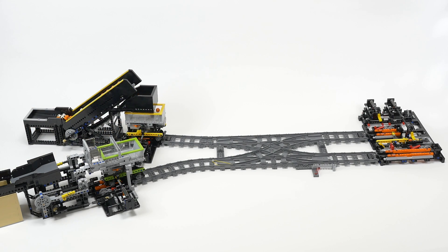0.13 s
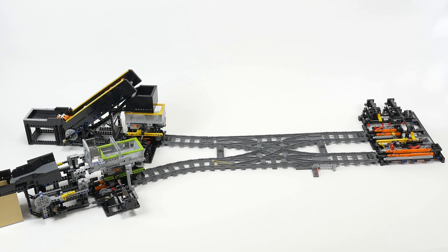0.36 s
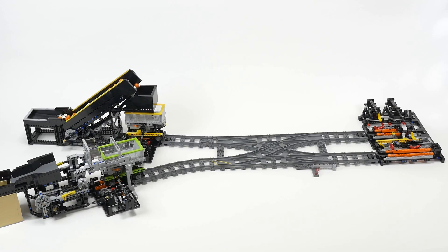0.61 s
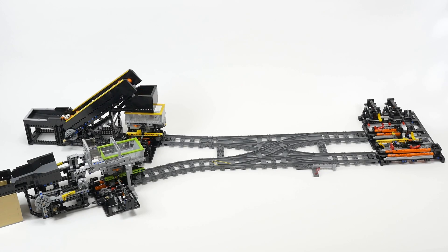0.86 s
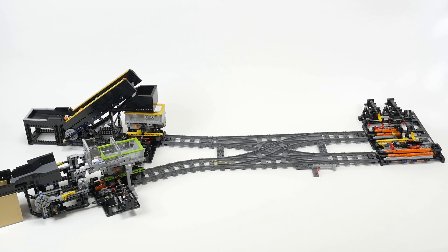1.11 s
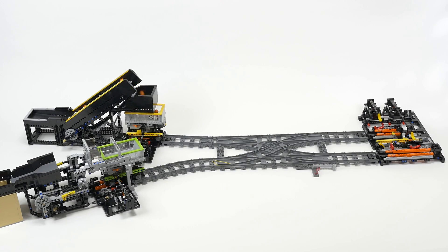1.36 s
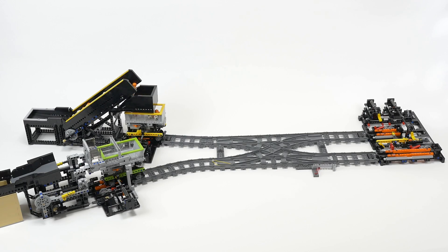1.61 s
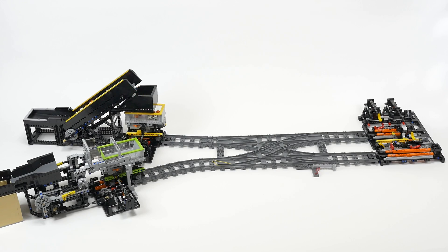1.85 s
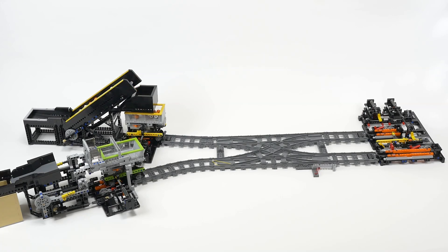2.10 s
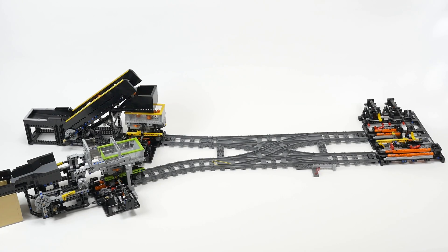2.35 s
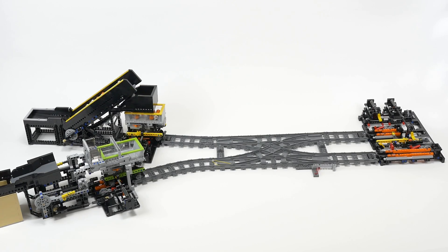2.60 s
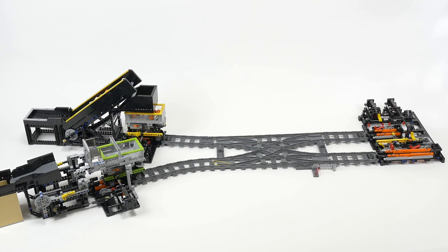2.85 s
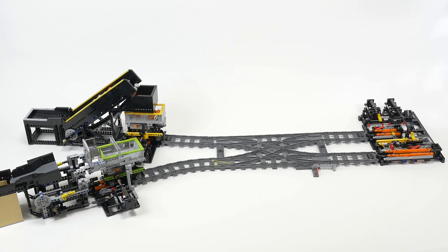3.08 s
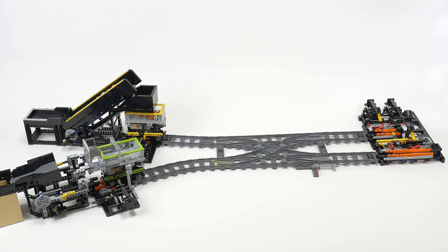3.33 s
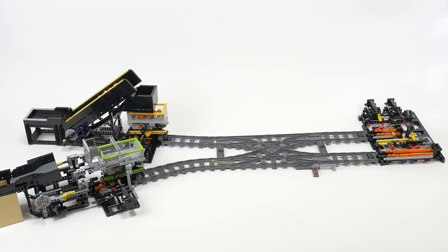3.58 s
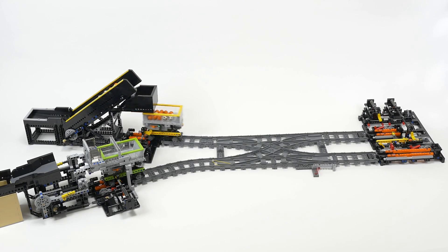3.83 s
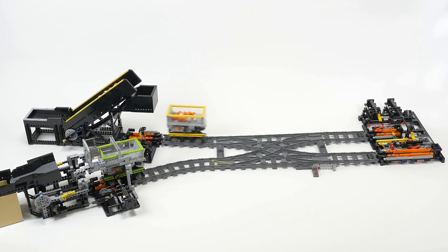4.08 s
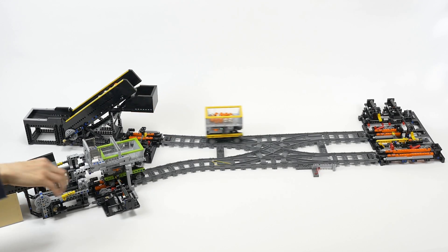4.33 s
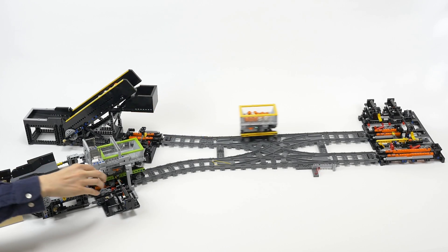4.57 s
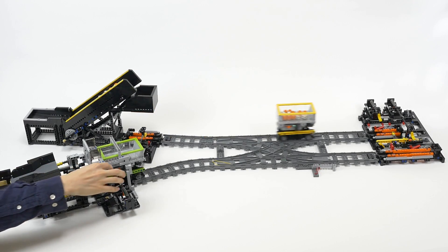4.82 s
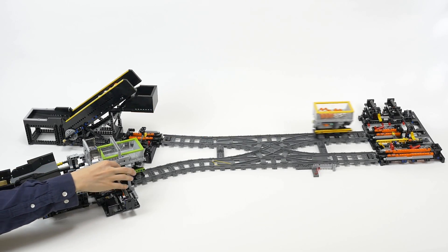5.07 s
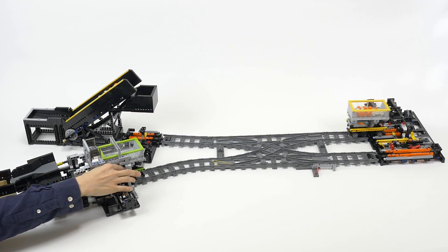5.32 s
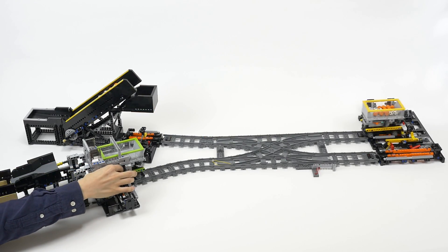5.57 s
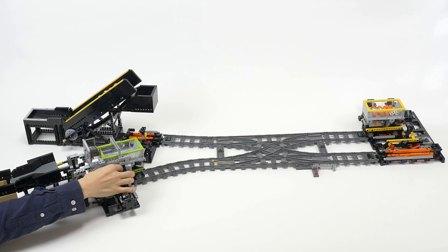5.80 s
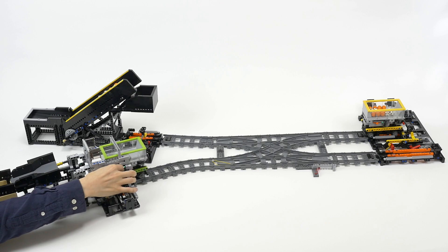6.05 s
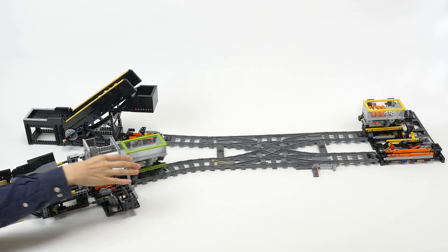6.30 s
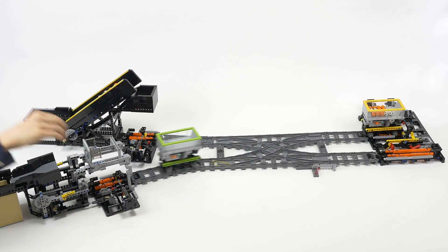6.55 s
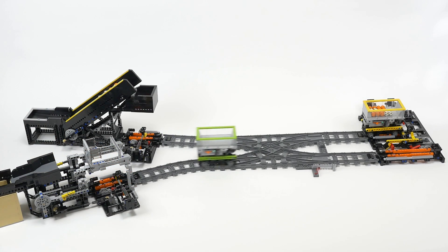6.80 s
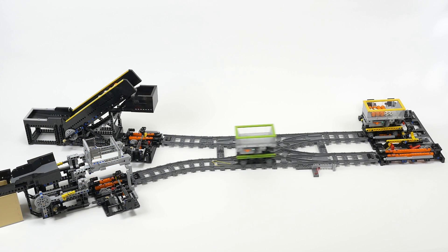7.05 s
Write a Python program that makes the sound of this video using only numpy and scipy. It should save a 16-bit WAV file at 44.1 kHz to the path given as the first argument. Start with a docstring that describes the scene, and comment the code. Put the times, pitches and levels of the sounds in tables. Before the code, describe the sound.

Close stereo pickup of a motorised plastic toy railway on a table. Sharp hollow clacks of balls landing in a wagon dominate the first seconds over a faint motor drone and thin whine. After a short lull the wagon lurches away in a rattling burst, rolls more softly, then scrapes and clacks into a platform. Finally soft thumps and a stronger motor whirr accompany another wagon. Short room decay.

```python
"""Plastic balls drop and bounce in a toy wagon, which later knocks as it rolls: random contact impulses
excite its hollow resonances, and a loose load rattles. Clacks, noise-like scraping and soft thumps follow
on track and platform. Geared motors drone, hiss and whine throughout, as filtered noise and a wavering
tone; a dry axle squeaks briefly. A low rumble lies beneath, and the blows decay in a small room, in stereo."""
import sys
import numpy as np
from scipy import signal
from scipy.fft import rfft, irfft, next_fast_len
from scipy.io import wavfile
from scipy.ndimage import uniform_filter1d

SR = 44100
rng = np.random.default_rng(int(sys.argv[2]) if len(sys.argv) > 2 else 0)


def to_wav(sig):
    """Store sig (one row per channel, or 1-D mono) as 16-bit WAV at the path in sys.argv[1].

    Samples outside -1..1 are clipped; the rate is SR.
    """
    pcm = np.clip(np.atleast_2d(sig), -1, 1) * 32767
    pcm = np.round(pcm).astype(np.int16)
    wavfile.write(sys.argv[1], SR, pcm.T)  # frames by channels


def decibels_to_gain(level_db):
    """Convert a level in decibels to a linear amplitude gain (20 dB per decade)."""
    exponent = np.asarray(level_db, float) / 20
    return 10 ** exponent


N = 316197

# ball drops and bounces, then knocks of the rolling wagon:
# (time [s], nominal peak [dB], brightness [dB], hollow ring [dB])
WAGON_KNOCKS = [(0.071, -1, 5.5, 1), (0.126, -3.5, 2.5, -23), (0.182, -11.5, 9, 15),
                (0.227, -10.5, 1.5, -8), (0.282, -18.5, 3, 6), (0.443, -22, 1, 6), (0.464, -3, -0.5, -3),
                (0.546, -10, 6.5, 9.5), (0.627, -13.5, -2.5, 2), (0.786, -15, 8, 8), (0.806, -6, 4, -3),
                (0.883, -1, 3, -7), (0.925, -12.5, -5, -2), (1.003, -10, 2, 1), (1.117, -17, 9, 15),
                (1.164, -3.5, 2.5, 0), (1.183, -8.5, 4, -1), (1.23, -9.5, 3, 9), (1.255, -10, 0.5, -5),
                (1.301, -9, 0, -7), (1.467, -17.5, 4.5, 6), (1.507, -4.5, 3.5, -6), (1.568, -10.5, 6.5, 14),
                (1.594, -19, 1, -1), (1.687, -14.5, 2.5, 4.5), (1.842, -7, 3, -1), (1.853, -3, 4.5, 2.5),
                (1.897, -1.5, 2, 1.5), (1.951, -12.5, -2.5, -9), (1.998, -16.5, 1, -2), (2.047, -22, 1, 22),
                (2.189, -4.5, 2.5, 3.5), (2.236, -10, 5, 7), (2.291, -23.5, -3, -7), (2.572, -2.5, 5, 3.5),
                (2.783, -24.5, 1, 12), (3.28, -2, 2.5, 8), (3.292, -3.5, -5, 11), (3.302, -3.5, 5.5, -3),
                (3.328, -8.5, 11.5, -6), (3.387, -13, 7, 26), (3.421, -10, 4, 9), (3.466, -15, -8, -10),
                (3.553, -11, 17, 16), (3.682, -13, 3.5, 9), (3.716, -11, -2, 10), (3.775, -19, -4, 8),
                (3.847, -17.5, 7, 12), (3.89, -9, 7, -3), (4.041, -11.5, -8, 10), (4.071, -11, 0, -11),
                (4.101, -9.5, -2, -2), (4.132, -19.5, 0, -9), (4.212, -26, -20, -8), (4.257, -21.5, -8, 2),
                (4.407, -21, -10, -3), (4.44, -23, -8, 5), (4.576, -26, -9, 12), (4.883, -34, -4, -3)]
# resonances of the hollow plastic wagon: (frequency [Hz], width [Hz], level [dB])
WAGON_MODES = [(828, 39, 3.5), (1120, 36, -1), (1533, 43.5, 3.5), (2140, 210, -8), (2530, 110, -12.5),
               (4060, 40, 0), (4484, 360, -5), (6200, 350, -6.5)]
# broad colour of the wagon's shell: (frequency [Hz], level per Hz [dB])
WAGON_SHELL = [(260, -37), (450, -19.5), (569, -18), (809, -10.5), (1370, -9), (1570, -3.5), (2780, -8.5),
               (4190, -10), (7980, -18.5), (11500, -17), (13200, -24.5), (15000, -50)]
# broad colour of the platform: (frequency [Hz], level per Hz [dB])
PLATFORM_SHELL = [(240, -30), (400, -13), (680, -8.5), (828, -12.5), (1090, -11.5), (2030, -2.5),
                  (3450, -9), (4530, -9), (7930, -16.5), (11400, -16), (13200, -22.5), (15000, -45)]
# broad colour of the table: (frequency [Hz], level per Hz [dB])
TABLE_COLOUR = [(140, -46), (240, -15), (360, -7.5), (414, -2.5), (487, -11.5), (532, -5.5), (893, -12),
                (1180, -11.5), (1400, -12), (1820, -54), (3080, -120)]
# motor drone: (time [s], level [dB])
DRONE_LEVEL = [(0.0, -45), (1.0, -43), (2.35, -46), (3.3, -43.5), (3.95, -44), (4.09, -36), (4.21, -40.5),
               (5.13, -41), (5.27, -39), (5.45, -35), (5.57, -41.5), (5.95, -47.5), (6.11, -40), (6.3, -33),
               (6.67, -39), (7.17, -36.5)]


def unit(x):
    """Normalization by mean power: x scaled to rms 1."""
    return x / np.sqrt(np.mean(x ** 2) + 1e-20)


def along(points, hz):
    """A spectrum read between its (Hz, value) points on a logarithmic frequency axis."""
    f, v = np.transpose(points)
    return np.interp(np.log(hz + 1), np.log(f + 1), v)


def curves(rows):
    """Linear interpolation in time: one value per sample for each column after the time."""
    s, *columns = np.transpose(rows)
    return [np.interp(np.arange(N) / SR, s, c) for c in columns]


def filtered(x, response):
    """Linear filtering: the spectrum of x times a response of frequency."""
    n = x.shape[-1]
    m = next_fast_len(n + 4096)
    return irfft(rfft(x, m) * response(np.fft.rfftfreq(m, 1 / SR)), m)[..., :n]


def causal(gain):
    """Minimum phase: folding the cepstrum makes the response start at the blow."""
    cepstrum = irfft(np.log(gain + 1e-6))
    half = len(cepstrum) // 2
    cepstrum[1:half] *= 2
    cepstrum[half + 1:] = 0
    return np.exp(rfft(cepstrum, len(cepstrum)))[:len(gain)]


def modes(peaks, f, scatter_db=0):
    """Modal superposition: the summed gains of damped resonances."""
    scatter_db = scatter_db + np.zeros(len(peaks))
    total = 0
    for (centre, width, db), extra_db in zip(peaks, scatter_db):
        total = total + decibels_to_gain(db + extra_db) * f * width / np.hypot(centre ** 2 - f ** 2, f * width)
    return total


def panned(db):
    """Interaural level difference: left and right gains that differ by db, positive to the left."""
    return decibels_to_gain(np.array([db / 2, -db / 2]))


def pair(gain, patchy_db):
    """Partly coherent stereo noise of rms 1, its level varying at random over time and frequency."""
    # (frequency [Hz], left-right correlation)
    likeness = [(60, 0.64), (240, 1), (950, 0.65), (3770, 0.42), (15000, 0.44)]
    z = signal.stft(rng.standard_normal((2, N)), nperseg=512)[2]
    field = rng.standard_normal(z.shape[1:])
    field = uniform_filter1d(uniform_filter1d(field, 5, 0), 8, 1)
    patchy = signal.istft(z * decibels_to_gain(patchy_db * unit(field)), nperseg=512)[1][:, :N]

    def mid_side_gain(hz):
        # the cosine of twice this angle is the correlation
        angle = np.arccos(np.clip(along(likeness, hz), -1, 1)) / 2
        return gain(hz) * np.array([np.cos(angle), np.sin(angle)])

    mid, side = filtered(patchy, mid_side_gain)
    return unit(np.array([mid + side, mid - side]))


def room(x, shared):
    """Reverberation: convolution with decaying stereo noise, each frequency dying at its own rate."""
    # (frequency [Hz], time to decay by 60 dB [s])
    decay = [(400, 0.042), (1500, 0.32), (4000, 0.25), (10000, 0.32)]
    common, left, right = rng.standard_normal((3, SR // 3))
    share = np.clip(shared, 0, 1)
    noise = share * common + np.sqrt(1 - share ** 2) * np.array([left, right])
    hz, t, z = signal.stft(noise, SR, nperseg=256)
    fading = decibels_to_gain(-60 * t / along(decay, hz)[:, None])
    tail = signal.istft(z * fading, SR, nperseg=256)[1]
    return signal.fftconvolve(x[None], tail / np.linalg.norm(tail[0]), axes=1)


def plastic(f, shell, tilt_db=0, ring_db=0, scatter_db=0, rings=1.2, hollow_hz=1570):
    """Struck plastic: shell colour and sharp modes, tilted by contact hardness, plus a hollow note."""
    tilt = tilt_db * np.clip(np.log2((f + 1) / 2500) / 1.34, 0, 1.3)
    hollow = ring_db * np.exp(-((f - hollow_hz) / 200) ** 2)
    return decibels_to_gain(along(shell, f) + tilt + hollow) * (0.5 + rings * modes(WAGON_MODES, f, scatter_db))


def knocks(events, shell, rings, wet_db, place_db):
    """Impact excitation: each knock is a flurry of contacts that rings the plastic, then the room."""
    contact_ms, softer_ms_per_db = 6.66, 0.25  # flurry length at 0 dB; softer knocks last longer
    crest_db = 11  # nominal peak over the flurry's rms
    out, t = np.zeros((2, N + SR)), np.arange(2048) / SR
    for s, db, bright_db, ring_db in events:
        length = max(contact_ms - softer_ms_per_db * db, 1) / 1000  # [s]
        pan_db = place_db + rng.standard_normal()  # knocks land a little left or right
        spikes = rng.standard_normal(len(t)) * decibels_to_gain(5.9 * rng.standard_normal(len(t)))
        rise = 1 - np.exp(-t / (0.4 * length))
        # small after-bounces of uneven strength
        uneven = unit(uniform_filter1d(rng.standard_normal(len(t)), 130))
        chatter = decibels_to_gain(-12.5 + 4.0 * uneven) * np.exp(-t / 0.018)
        flurry = spikes * rise * (np.exp(-(t / length) ** 3) + chatter)
        scatter_db = 3 * rng.standard_normal(len(WAGON_MODES))
        # the hollow note varies at random from knock to knock
        hollow_hz = 1570 + 60 * rng.standard_normal()
        hit = filtered(flurry, lambda f: causal(
            plastic(f, shell, bright_db, ring_db, scatter_db, rings, hollow_hz)))
        hit *= decibels_to_gain(db - crest_db) / np.sqrt(np.sum(hit ** 2) / (SR * length))
        wet = decibels_to_gain(wet_db) * room(hit, shared=0.6)
        sides = panned(pan_db)[:, None]
        out[:, round(s * SR):][:, :len(t)] += sides * hit
        out[:, round((s + 0.005) * SR):][:, :wet.shape[1]] += sides * wet  # the first walls answer late
    return out[:, :N]


def jostle(gain, pan_db, shell, rings, per_second, near_share):
    """Shot noise: dense tiny clicks of uneven size through plastic, mostly lost in diffuse noise."""
    clicks = (rng.random(N) < per_second / SR) * rng.standard_normal(N)
    clicks = clicks * decibels_to_gain(4 * rng.standard_normal(N))
    near = unit(filtered(clicks, lambda f: causal(plastic(f, shell, rings=rings))))
    far = pair(lambda f: plastic(f, shell, rings=rings), patchy_db=3.5)
    return gain * panned(pan_db)[:, None] * (near_share * near + far)


def swell(s, db, rise_s, fall_s):
    """Exponential growth and decay: power that grows towards a moment and dies after it."""
    t = np.arange(N) / SR - s
    time_constant = np.where(t < 0, max(rise_s, 1e-3), max(fall_s, 1e-3))
    return decibels_to_gain(db) ** 2 * np.exp(-2 * np.abs(t) / time_constant)


def air_rumble():
    """Ambient noise: a steady low rumble shaped by its power spectrum."""
    # (frequency [Hz], level per Hz [dB])
    rumble_colour = [(12, -49), (20, -21), (32, -36), (65, 11), (108, 2), (130, 5), (170, -51), (290, -120)]
    return decibels_to_gain(-68.5) * pair(lambda f: decibels_to_gain(along(rumble_colour, f)), patchy_db=1.0)


def motor_drone():
    """Forced vibration: broad motor noise excites the table's colour and the housing's resonances."""
    # motor housing and table: (frequency [Hz], width [Hz], level [dB])
    housing = [(423, 66, 2.5), (1160, 20.4, 9)]
    level_db, = curves(DRONE_LEVEL)
    colour = lambda f: decibels_to_gain(along(TABLE_COLOUR, f)) * (1 + 1.22 * modes(housing, f))
    return decibels_to_gain(level_db) * pair(colour, patchy_db=1.5)


def wheel_rumble():
    """Rolling noise: low random vibration through the table that follows the drone's swings."""
    # (frequency [Hz], level per Hz [dB])
    rolling_colour = [(29, -52), (50, -21), (124, -16), (193, -3.5), (231, -11.5), (320, 1), (420, -33),
                      (700, -120)]
    drone_db, = curves(DRONE_LEVEL)
    level_db = -51 + 0.87 * (drone_db - drone_db.mean())
    return decibels_to_gain(level_db) * pair(lambda f: decibels_to_gain(along(rolling_colour, f)), patchy_db=3.0)


def gear_hiss():
    """Friction noise: the gears' bright, broadband hiss."""
    # (frequency [Hz], level per Hz [dB])
    gear_colour = [(760, -23), (1300, -48), (2950, -8), (3170, -3.5), (4650, -11.5), (5330, -1),
                   (5790, -3.5), (6350, -1), (9620, -4), (13300, -5), (15500, -18)]
    # (time [s], level [dB])
    hiss_level = [(0, -41.5), (2.4, -43.5), (3.8, -43.5), (5.0, -40.5), (5.6, -43.5), (6.1, -41),
                  (6.5, -37), (7.17, -36)]
    level_db, = curves(hiss_level)
    return decibels_to_gain(level_db) * pair(lambda f: decibels_to_gain(along(gear_colour, f)), patchy_db=0.8)


def mesh_whine():
    """Gear mesh tone: a sine with random frequency and amplitude modulation."""
    # (time [s], mean frequency [Hz], mean level [dB])
    mesh = [(0, 1120, -50), (3.7, 1142, -61), (3.95, 1140, -53), (4.5, 1143, -44), (5.0, 1160, -55),
            (5.3, 1130, -46), (6.1, 1188, -51), (6.6, 1202, -50), (7.17, 1220, -44)]
    hz, level_db = curves(mesh)
    waver = unit(uniform_filter1d(rng.standard_normal((2, N)), 900))
    phase = 2 * np.pi * np.cumsum(hz + 22 * waver[1]) / SR
    return decibels_to_gain(level_db + 3 * waver[0]) * np.sin(phase)


def squeaks():
    """Dry friction: an axle's short, thin bursts of a high tone and band-limited noise."""
    # (time [s], level before a common trim [dB])
    axle = [(0.668, -29), (0.728, -23), (3.1198, -30), (3.1467, -28), (3.1727, -27), (3.2061, -28)]
    out, t = np.zeros(N), np.arange(1024) / SR
    for s, db in axle:
        tone = np.sin(2 * np.pi * 12250 * t)
        noise = filtered(rng.standard_normal(len(t)), lambda f: (f > 8000) * (f < 13800))
        envelope = decibels_to_gain(db - 4.0 - 60 * t / 0.05) * (1 - np.exp(-t / 0.0014))
        out[round(s * SR):][:len(t)] += envelope * (tone + 1.5 * noise)
    return out


def thumps():
    """Low-frequency impact: the wagon's weight sends a soft puff and a deeper push through the table."""
    # (time [s], level [dB], level of the deep push relative to the puff [dB])
    weight = [(3.562, -36, -9), (3.575, -33.5, -8.5), (3.609, -48, -19), (3.888, -33.5, -19),
              (3.92, -35, -14), (4.079, -45.5, -6), (5.062, -41, -16), (5.339, -35, -27), (5.39, -41, -8),
              (6.211, -32, -20), (6.24, -42, -25), (6.287, -45, -19), (6.349, -36, -12), (6.389, -32, -21),
              (6.449, -43, -16), (6.939, -37.5, -10)]
    out, t = np.zeros(N + SR), np.arange(4096) / SR
    table_gain = lambda f: decibels_to_gain(along(TABLE_COLOUR, f)) / (1 + (f / 700) ** 4)
    deep_gain = lambda f: f * f / (f * f + 110 ** 2) / (1 + (f / 190) ** 4)
    for s, db, depth_db in weight:
        puff = rng.standard_normal(len(t)) * (1 - np.exp(-t / 0.0017)) * decibels_to_gain(-60 * t / 0.3)
        body = unit(filtered(puff, lambda f: causal(table_gain(f))))
        deep = unit(filtered(puff, lambda f: causal(deep_gain(f))))
        out[round(s * SR):][:len(t)] += decibels_to_gain(db) * (body + decibels_to_gain(depth_db) * deep)
    return out[:N]


def scrape():
    """Sliding friction: gain of the dragged wagon, summing the powers of separate pushes."""
    # pushes along the platform: (time of the peak [s], peak gain [dB], rise [s], fall [s])
    pushes = [(4.9, -38, 0.027, 0.058), (5.03, -39, .02, 0.22), (5.21, -27, 0.013, 0.026),
              (5.4, -23.5, .04, 0.072), (5.48, -21.5, 0.031, 0.057), (5.67, -29.5, 0.023, 0.062),
              (5.76, -21, 0.054, 0.062), (5.99, -32, 0.036, 0.12), (6.1, -33.5, .03, 0.046),
              (6.22, -35, 0.062, .1), (6.4, -31.5, 0.043, 0.04), (6.95, -33.5, 0.11, 0.036),
              (7.17, -36.5, .06, 0.063)]
    # the hand-pushed wagon keeps rubbing faintly
    creep = decibels_to_gain(-41) * (np.arange(N) / SR > 5.95)
    return np.sqrt(sum(swell(*row) for row in pushes) + creep ** 2)


def platform():
    """Impact and friction: wheels and levers clack on track and platform while a wagon scrapes."""
    # (time [s], nominal peak [dB], brightness [dB], hollow ring [dB])
    clacks = [(5.035, -19, 11, -3), (5.202, -19, 18, 15.5), (5.346, -18, 16, 24), (5.371, -15.5, -3, 3),
              (5.452, -8.5, 1, -4), (5.48, -6, -0.5, 6), (5.725, -14.5, 2, 7), (5.778, -6.5, -0.5, 12.5),
              (5.941, -20.5, 7, -7), (5.965, -23.5, -2, 2), (6.038, -20.5, 10, 11), (6.211, -24.5, 0, 18),
              (6.267, -21, 6, 10), (6.383, -20, 8, 12), (6.919, -22, 14, 19), (6.944, -17.5, -23, 11)]
    struck = knocks(clacks, PLATFORM_SHELL, rings=0.55, wet_db=2.0, place_db=-3.0)
    dragged = jostle(scrape(), pan_db=-4.0, shell=PLATFORM_SHELL, rings=0.63,
                     per_second=2500, near_share=0.45)
    return struck + dragged


def rattle():
    """Power summation: gain of the loose load, stirred by every knock and shaken by belt and ride."""
    # load shaken by the belt, then by the ride: (time [s], gain [dB])
    shaking = [(0, -35.5), (2.2, -45), (3.2, -47.5), (3.45, -29), (3.7, -28.5), (3.8, -44), (4.0, -27.5),
               (4.2, -40.5), (4.42, -38), (4.55, -47.5), (4.9, -42.5), (5.0, -70)]
    delay_s, lead_s = 0.087, 0.0063
    stirred = lead_in = 0
    for s, db, *_ in WAGON_KNOCKS:
        stirred = stirred + swell(s + delay_s, db - 30.5, delay_s / 2, 0.034)
        # a brief swell of rattle leads into each knock
        lead_in = lead_in + swell(s, db - 24.5, lead_s, lead_s / 4)
    return np.sqrt(stirred + lead_in + decibels_to_gain(curves(shaking)[0]) ** 2)


def wagon():
    """Impact excitation of a hollow body: drops, bounces and rolling knocks over a rattling load."""
    struck = knocks(WAGON_KNOCKS, WAGON_SHELL, rings=1.0, wet_db=0.0, place_db=-0.8)
    loose = jostle(rattle(), pan_db=-2.0, shell=WAGON_SHELL, rings=0.84,
                   per_second=740, near_share=0.38)
    return struck + loose


def scene():
    """Linear superposition: all sources over the low rumble."""
    motors = motor_drone() + wheel_rumble() + gear_hiss() + mesh_whine()
    return air_rumble() + motors + squeaks() + thumps() + platform() + wagon()


def low_pass(x):
    """Removes everything above the highest recorded frequency."""
    return signal.sosfilt(signal.butter(12, 15770, fs=SR, output="sos"), x)


def record(dry):
    """Level-dependent filtering: upper bass yields to far louder sound; a narrow dip and a band limit."""
    bass = filtered(dry, lambda f: 1 / (1 + (f / 250) ** 8) / (1 + (115 / (f + 1)) ** 8))
    rest_power = np.abs(uniform_filter1d(np.mean((dry - bass) ** 2, axis=0), 3000))
    bass_power = np.abs(uniform_filter1d(np.mean(bass ** 2, axis=0), 3000))
    # the bass is halved where the rest is 30 dB stronger
    duck = 1 / (1 + (rest_power / (bass_power + 1e-12) / decibels_to_gain(2 * 30)) ** 2)
    dip = lambda f: (1 - 0.9 * np.exp(-np.abs(f - 7850) / 90)) * (f < 15650)
    mix = filtered(dry - (1 - duck) * bass, dip)
    return low_pass(mix)


dry = scene()
out = record(dry)
to_wav(out)
```